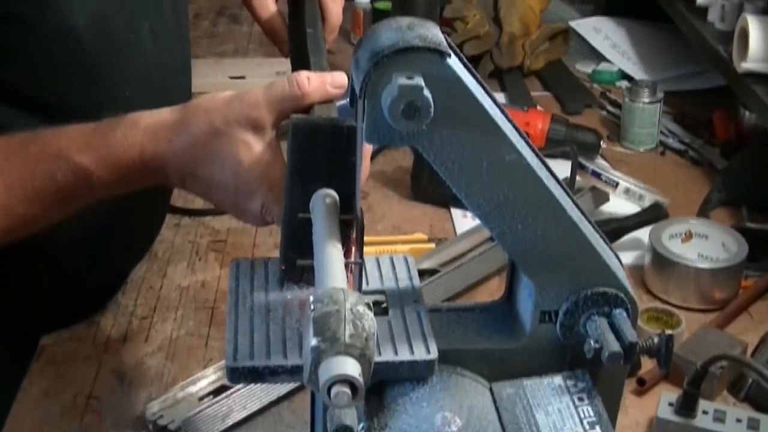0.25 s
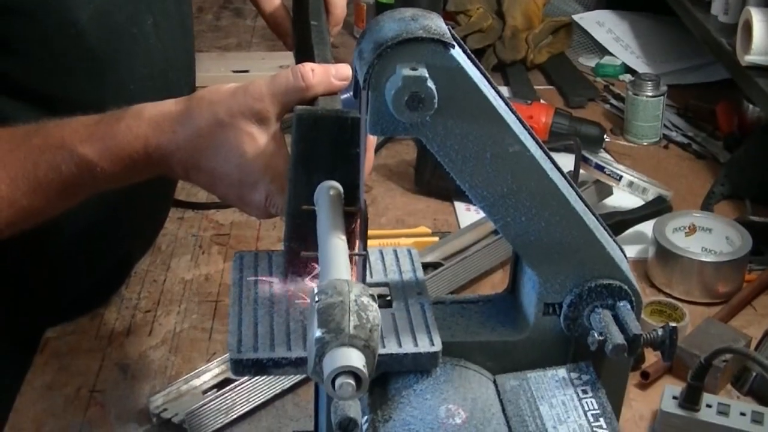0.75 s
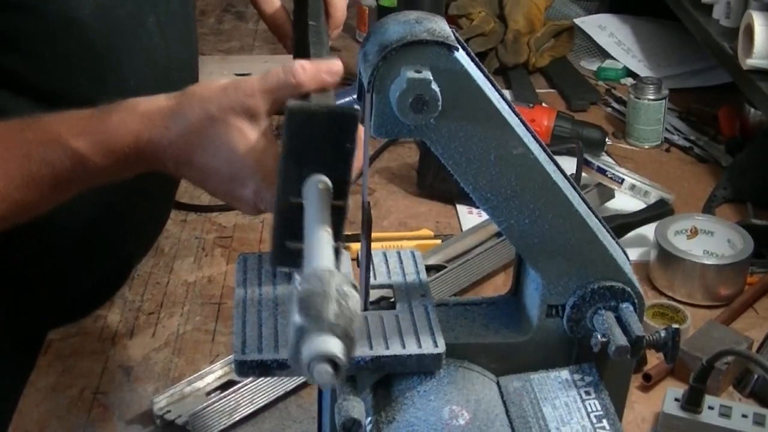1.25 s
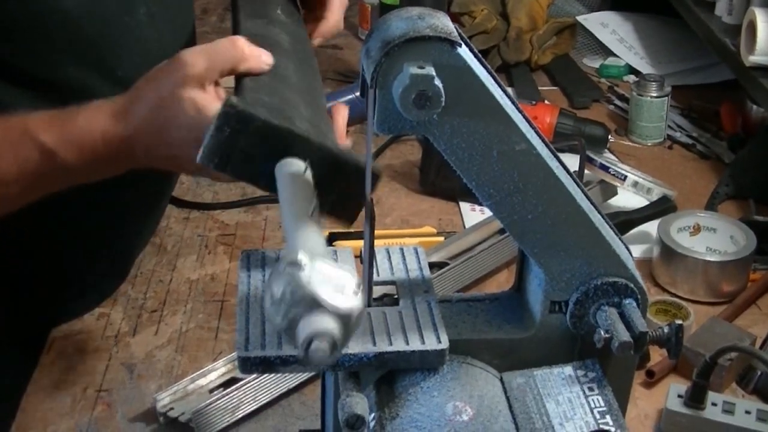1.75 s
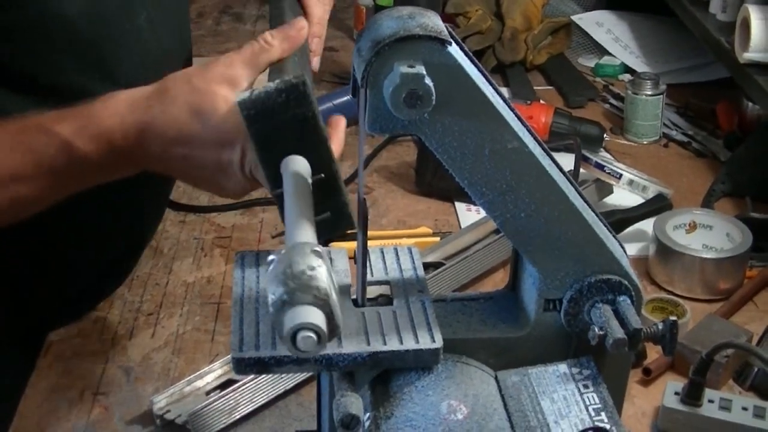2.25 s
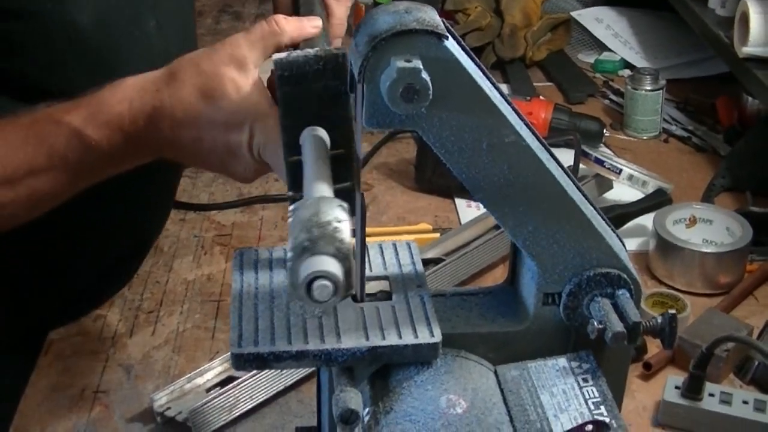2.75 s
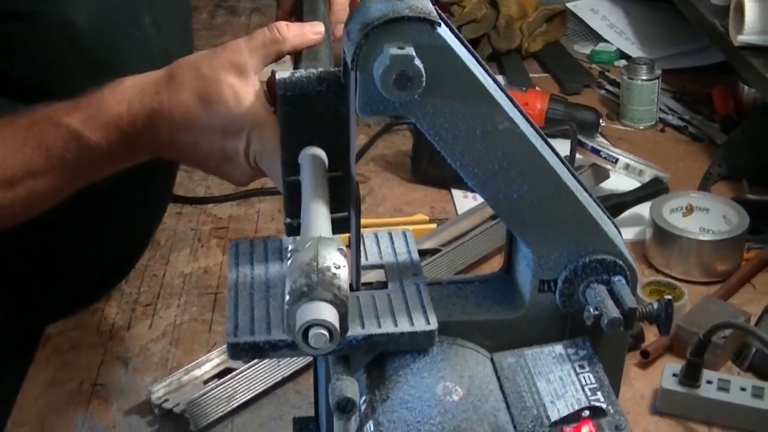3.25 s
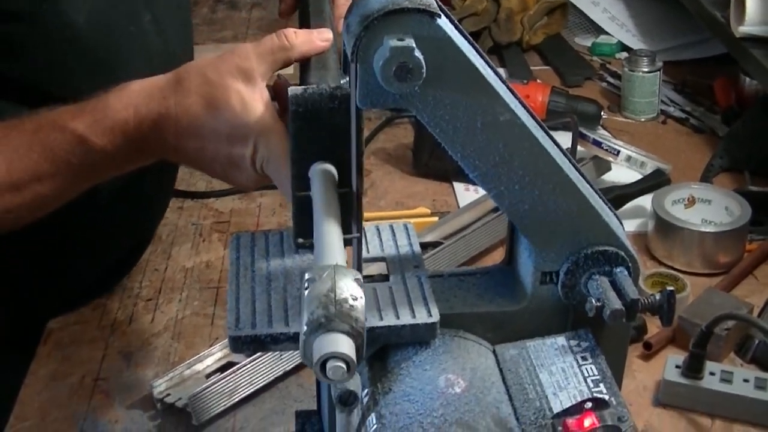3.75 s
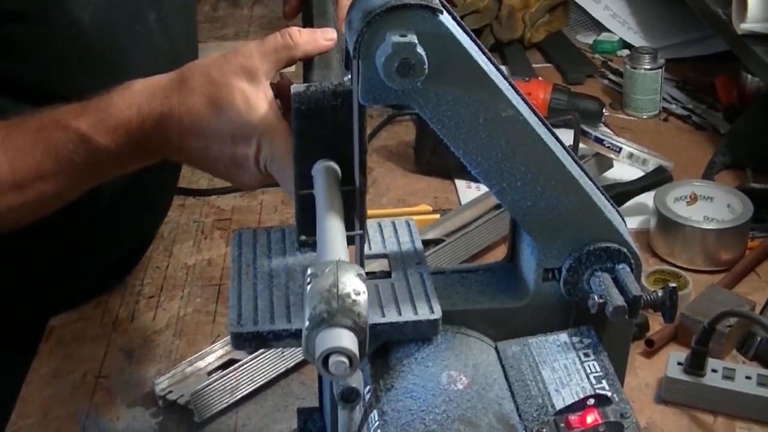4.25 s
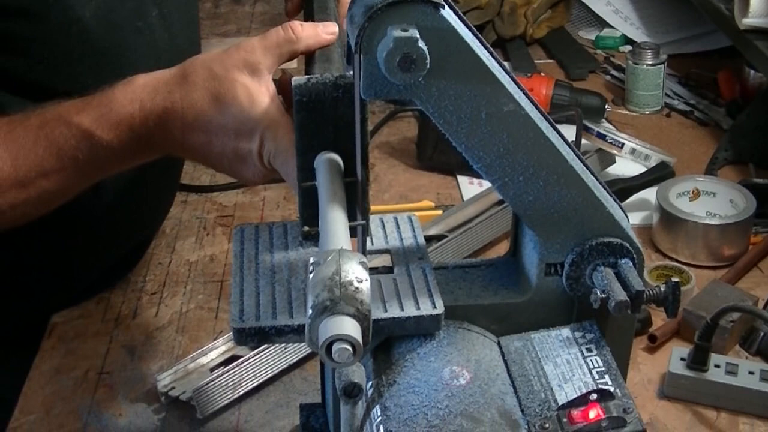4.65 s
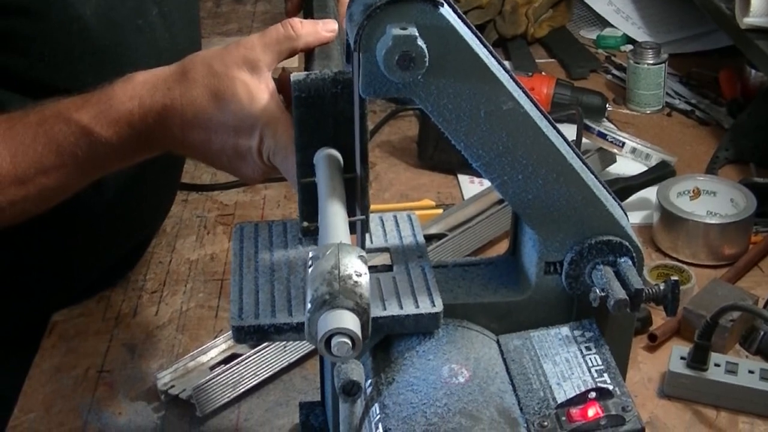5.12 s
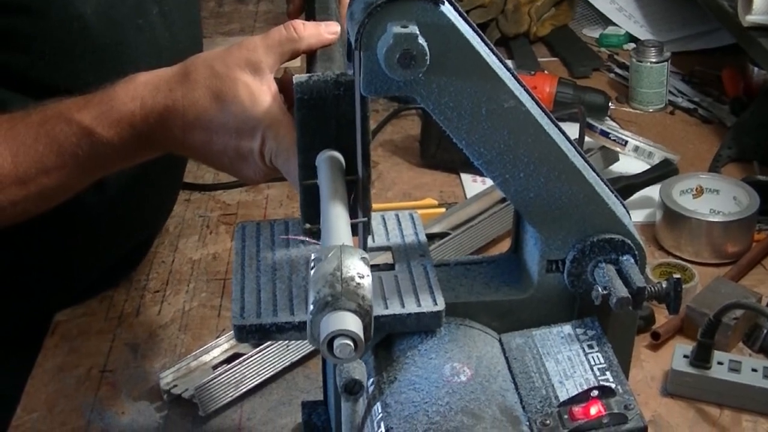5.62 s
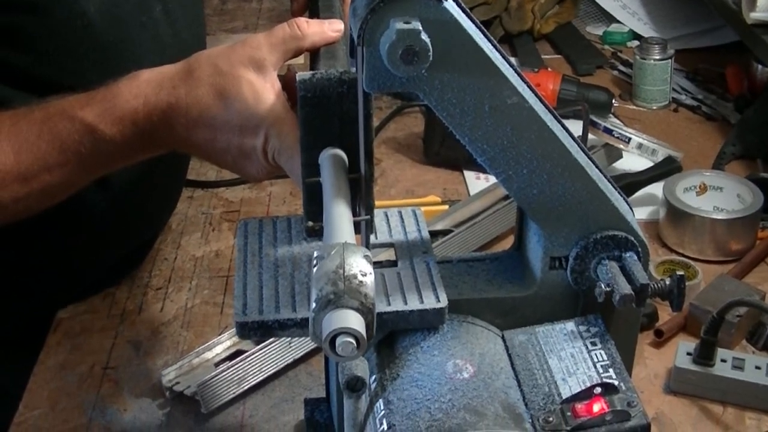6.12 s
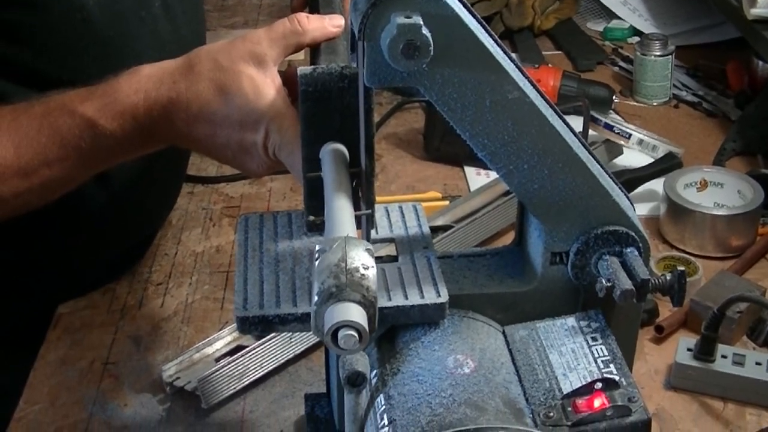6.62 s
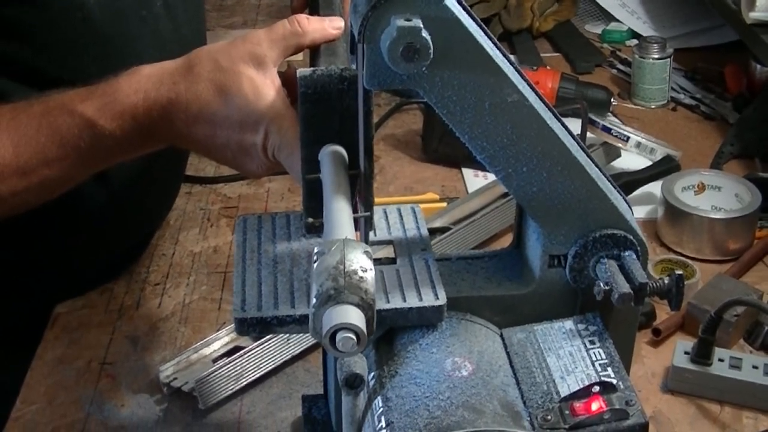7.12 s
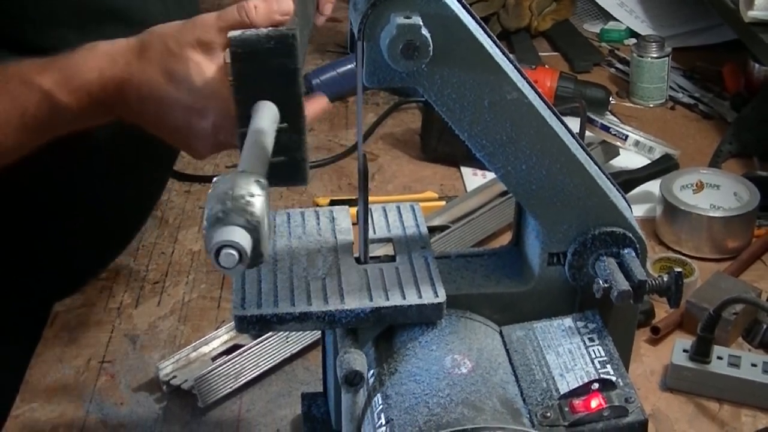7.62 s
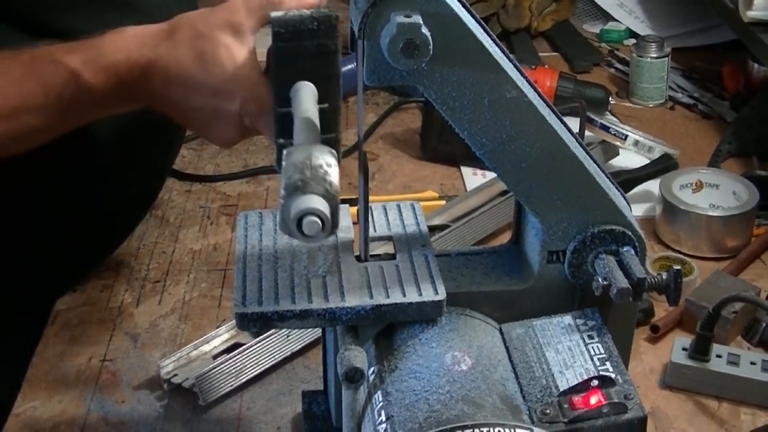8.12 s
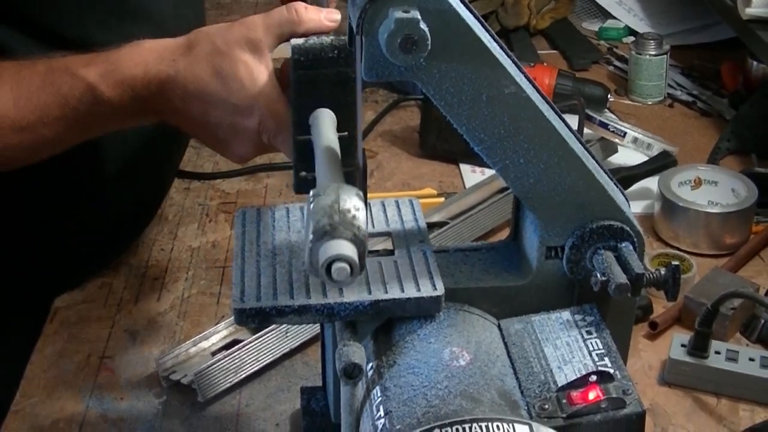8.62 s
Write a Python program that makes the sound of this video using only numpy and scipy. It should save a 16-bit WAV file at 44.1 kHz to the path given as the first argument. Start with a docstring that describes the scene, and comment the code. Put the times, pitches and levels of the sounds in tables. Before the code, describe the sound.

Metal hisses and rings against the belt of a bench sander, heard close up in a workshop. The grinding stops after about a second, leaving the machine's steady hum and buzzing rattle and one brief, high squeak. Then the metal is pressed on again for several seconds, its loud hiss covering the machine. The sander idles briefly before more grinding comes at the very end.

```python
"""A bench belt sander runs: three wheels knock once a turn at nearly the same speed and beat, over
motor hum and the rattle of belt and frame. A clamped metal piece is pressed on the belt in two long
passes and three short touches; grit tears at it, so it hisses and rings, and the load slows the wheels.
One thin squeak sounds between the passes. Gain control pulls the machine down under the hiss."""
import sys
import numpy as np
from scipy import signal
from scipy.io import wavfile
from scipy.ndimage import uniform_filter1d

SR = 44100
rng = np.random.default_rng(int(sys.argv[2]) if len(sys.argv) > 2 else 0)


def digitize_waveform(pressure):
    """Quantize a signal to 16-bit integers and store it at the path in sys.argv[1].

    Rows of a 2-D input are taken as channels; values are limited to [-1, 1].
    """
    field = np.atleast_2d(pressure).T
    bounded = np.clip(field, -1, 1)
    quanta = np.round(bounded * 32767).astype(np.int16)
    wavfile.write(sys.argv[1], SR, quanta)


N = 391166

# Harmonics of the turn rate in the knock. Each entry: harmonic number.
HARMONICS = [*range(1, 14), *range(15, 23)]
# Knock, by HARMONICS. Each row: wheel 1 level in dB, wheel 2 level in dB, wheel 2 phase lead in cycles.
KNOCK_SPECTRUM = [(-57, -56.0, 0.62), (-51.3, -40.0, 0.42), (-28.2, -61.2, 0.71), (-25.9, -30.9, 0.93),
                  (-28.4, -46.8, 0.93), (-37.0, -48.4, 0.59), (-25.9, -32.6, 0.98), (-43.7, -35.0, 0.83),
                  (-45.6, -52.3, 0.1), (-48.8, -56.1, 0.18), (-33.8, -49.8, 0.48), (-41.1, -39.4, 0.66),
                  (-34.5, -28.4, 0.62), (-38.3, -39.3, 0.61), (-41.3, -50.0, 0.75), (-62.3, -33.5, 0.63),
                  (-33.4, -33.7, 0.97), (-46.5, -50.6, 0.14), (-51.5, -44.2, 0.44), (-51.3, -46.9, 0.2),
                  (-51.8, -44.0, 0.59)]
# Wheel 3 knock, keyed by harmonic. Each row: level in dB, initial lead on wheel 1 in cycles.
THIRD_KNOCK = {1: (-56, .31), 4: (-41, .94), 8: (-39, .88), 9: (-45, .91), 10: (-46.5, .18),
               13: (-42.5, .13), 18: (-40, .37), 19: (-45, .43), 22: (-52, .09)}
# Harmonics that swell slowly. Each entry: harmonic number.
SWELLING_HARMONICS = [4, 7, 11]
# Machine drift. Each row: time in seconds, overall gain in dB, gains of harmonics 4, 7 and 11 in dB.
LEVEL_DRIFT = [(0.0, -0.5, -1.5, -0.5, -4), (0.7, 0.3, -1, -3, -3), (1.2, 0, -1.8, -0.5, 2),
               (1.6, -1.5, 0, 2.7, -5), (2.4, -1.5, 0.6, 5.5, 6), (3.1, 0.1, 2, 8.5, -2),
               (3.55, 2, -3, -10.5, -3), (4.2, 2, 1, 3, 4), (4.6, 0, 1, 4, -6), (5.0, 0.8, 1.3, 0.5, -3),
               (5.4, -1.5, 5, -3.5, 5), (5.9, -2.3, 2.5, 5, 7), (6.8, -3.5, 1, 10, 0.1),
               (7.2, -3, -2.5, 5.5, 1), (7.7, -1.2, -5, -0.5, 4), (8.2, 0, 1, -6.5, 0.1),
               (8.87, 0.7, 0.6, 2.5, 0.1)]
# Motor hum. Each row: frequency in Hz, level in dB.
HUM_TONES = [(59.5, -55), (89.4, -64), (120, -62.5), (182.7, -64), (240, -58)]
# Belt and bearing noise. Each row: frequency in Hz, relative density in dB.
RATTLE_SPECTRUM = [(30, -44), (150, -34.5), (250, -19), (400, -12.5), (650, -10), (900, -8.5), (1400, -9.5),
                   (2200, -8), (3200, -11), (5000, -14.5), (8500, -13.5), (11000, -15), (12000, -21.5),
                   (15800, -34)]
# Frame resonances and notches. Each row: centre in Hz, width in Hz, gain in dB.
FRAME_MODES = [(790, 120, 8), (1750, 150, 3), (2250, 100, -5), (2420, 60, 4), (2580, 130, 8),
               (3900, 150, -7), (4180, 100, 12), (6520, 250, 7), (7280, 90, 9), (7560, 90, 6),
               (10200, 250, 5), (10500, 100, 6), (11200, 60, 5), (11700, 120, 6)]
# Piece on the belt. Each row: touch in seconds, lift in seconds, level in dB, level slope in dB/s,
# treble tilt in dB/octave, speed sag at full force in Hz.
PRESS_EVENTS = [(-2.0, 1.09, -11.3, 0, -0.7, 1.02), (3.57, 3.9, -9.5, -30, 2.5, 0.75),
                (3.855, 7.19, -7.8, -1.6, 1.5, 0.7), (8.555, 8.86, -9, -40, 0.2, 0.6),
                (8.81, 9.5, -13, 0, 2, 0.5)]
# Grinding hiss. Each row: frequency in Hz, relative density in dB.
GRIND_SPECTRUM = [(800, -29), (2000, -7), (3500, -11), (4500, -7), (6000, -2), (8000, -5), (10500, -5.5),
                  (12000, -8.5), (14000, -16.5), (15800, -21.5)]
# Ring of the piece. Each row: centre in Hz, width in Hz, gain in dB for each of four grips.
PIECE_MODES = [(2590, 70, 3, 11, 8, 3), (4465, 60, 16, -4, -4, 2), (4910, 80, 0, 6, 6, 0),
               (5020, 70, 11, 0, 0, 0), (5280, 110, 0, 4, 3, 0), (5650, 350, -1, 7, 4, 1),
               (6370, 150, 4, 3, 2, 3), (6870, 300, 3, 1, -1, 6), (7260, 150, 6, 1, 1, 2),
               (7950, 200, 1, 6, 2, 3), (8880, 80, 3, 1, 1, 3), (9510, 60, 1, 1, 5, 1),
               (9960, 170, 4, 2, 2, 1), (10400, 350, 1, 6, 9, 1), (10900, 300, 3, 4, 2, 1),
               (12000, 400, -5, -3, -4, -2), (12500, 150, 2, 4, 4, 3)]
# Grip changes. Each entry: time in seconds.
GRIP_CHANGES_S = [2, 4.9, 8]
# Squeak. One row: centre in seconds, pitch in Hz, 1/e half-width in seconds, peak level in dB.
SQUEAK_EVENT = (2.76, 11213, .04, -24)
# Stereo width of the noise. Each row: frequency in Hz, left-right correlation from 0 to 1.
CORRELATION = [(60, 0.48), (300, 0.91), (1000, 0.99), (1700, 0.98), (2400, 1), (3800, 0.8), (4500, 0.97),
               (7000, 0.7), (11000, 0.71), (12700, .3), (15000, 0.29)]
# Stereo balance of the noise. Each row: frequency in Hz, left minus right in dB.
BALANCE = [(60, -12), (180, -6.5), (550, 0.5), (1650, -0.5), (4970, -0.5), (15000, -4.5)]

IDLE_HZ, BELT_TURN_S = 108.385, .04505  # unloaded wheel 1 rate; belt period
SECOND_SLIP_HZ, THIRD_SLIP_HZ, SECOND_LEAD_TURNS = .1103, .024, .016  # relative to wheel 1
DAMPED_HARMONIC, UNLOADED_BOOST_DB, DAMPING_DB_PER_HZ = 5, 3.5, 9  # a loaded belt damps this harmonic
ATTACK_S, EASE_S, EASED_FORCE, RELEASE_S = .055, .17, .55, .04
SAG_S, SPEED_LAG_S = .4, .07  # speed sags slowly, recovers quickly
FLASH_DB_PER_OCT, FLASH_S = 6.5, .05  # each touch starts brighter
RATTLE_DB, CUTOFF_HZ = -16, 15720


def amp(db):
    """Decibels to gain."""
    return 10 ** (np.asarray(db) / 20)


def unit_rms(x):
    """Scales to rms 1."""
    return x / np.sqrt(np.mean(x ** 2) + 1e-20)


def at_hz(table, hz):
    """Interpolates a table over log frequency."""
    table_hz, values = np.transpose(table)
    return np.interp(np.log(hz + 1), np.log(table_hz + 1), values)


def drift_db(column, t):
    """One gain column of LEVEL_DRIFT over time."""
    rows = np.array(LEVEL_DRIFT)
    return np.interp(t, rows[:, 0], rows[:, column])


def resonance_db(modes, column, hz):
    """Sum of resonance peaks and dips."""
    return sum(mode[column] / (1 + (2 * (hz - mode[0]) / mode[1]) ** 2) for mode in modes)


def belt_noise(memory, shape):
    """Noise that partly repeats every belt turn."""
    period = round(BELT_TURN_S * SR)
    fresh = rng.standard_normal((N // period + 1, *shape, period))
    repeating = signal.lfilter([1], [1, -memory], fresh, axis=0)
    return unit_rms(np.moveaxis(repeating, 0, -2).reshape(*shape, -1)[..., :N])


def shape_stereo(pair, colour_db, patch_db, ripple_db, flicker_db):
    """Colours two noises into unit-rms stereo with patches, fine ripple and treble flicker."""
    hz, t, (common, other) = signal.stft(pair, SR, nperseg=1024, noverlap=768)
    fast, slow = rng.standard_normal((len(t), len(hz), 2)).T
    patches = unit_rms(uniform_filter1d(uniform_filter1d(fast, size=10, axis=0), size=14, axis=1))
    # Bench echoes comb the noise; the comb shifts as the hands move.
    ripple = unit_rms(uniform_filter1d(uniform_filter1d(slow, size=2, axis=0), size=250, axis=1))
    hz = hz[:, None]
    flicker = unit_rms(uniform_filter1d(rng.standard_normal(len(t)), size=16)) * np.clip(hz / 5000, 0, 1)
    correlation = np.clip(at_hz(CORRELATION, hz), 0, 1)
    pan = amp(at_hz(BALANCE, hz) / 2)
    right = correlation * common + np.sqrt(1 - correlation ** 2) * other
    spectra = np.array([common * pan, right / pan])
    spectra *= amp(colour_db(hz, t) + patch_db * patches + ripple_db * ripple + flicker_db * flicker)
    return unit_rms(signal.istft(spectra, SR, nperseg=1024, noverlap=768)[1][:, :N])


def wheel_knock(t, turns, load_hz):
    """Three wheels knock once a turn; harmonic k beats at k times their slip."""
    second_lead_turns = SECOND_LEAD_TURNS + SECOND_SLIP_HZ * t
    first_and_third, second = np.zeros((2, N))
    for k, (first_db, second_db, lead) in zip(HARMONICS, KNOCK_SPECTRUM):
        phase = 2 * np.pi * (k * turns + .07 * k ** 2)  # k squared smears the knock in time
        gain = amp(drift_db(SWELLING_HARMONICS.index(k) + 2, t)) if k in SWELLING_HARMONICS else 1
        if k == DAMPED_HARMONIC:
            gain = amp(UNLOADED_BOOST_DB - DAMPING_DB_PER_HZ * load_hz)
        first_and_third += amp(first_db) * gain * np.cos(phase)
        second += amp(second_db) * gain * np.cos(phase + 2 * np.pi * (k * second_lead_turns + lead))
        if k in THIRD_KNOCK:
            third_db, third_lead = THIRD_KNOCK[k]
            third_phase = phase + 2 * np.pi * (k * THIRD_SLIP_HZ * t + third_lead)
            first_and_third += amp(third_db) * gain * np.cos(third_phase)
    return np.sqrt(2) * (first_and_third * amp([[-1.1], [.9]]) + second * amp([[-.3], [.3]]))


def motor_hum(t):
    """Steady shaft and mains tones."""
    return sum(np.sqrt(2) * amp(db) * np.sin(2 * np.pi * (hz * t + rng.random())) for hz, db in HUM_TONES)


def frame_rattle(turns):
    """Belt and bearing noise through the frame, shaken by every wheel turn."""
    def colour_db(hz, _):
        return at_hz(RATTLE_SPECTRUM, hz) + resonance_db(FRAME_MODES, 2, hz)

    shake = 1 + .1 * np.cos(2 * np.pi * turns) + .06 * np.cos(6 * np.pi * turns)
    crackle = amp(2.5 * rng.standard_normal(N))
    noise = belt_noise(memory=.17, shape=(2,)) * shake * crackle
    return amp(RATTLE_DB) * shape_stereo(noise, colour_db, patch_db=.83, ripple_db=2.85, flicker_db=.84)


def hand_presses(t):
    """Each press bites, holds, eases and lifts; the speed sag trails the load."""
    gain, tilt_db_per_oct, load_hz, sag_hz = np.zeros((4, N))
    for touch_s, lift_s, level_db, slope_db_per_s, held_tilt, full_sag_hz in PRESS_EVENTS:
        elapsed_s, remaining_s = np.maximum(t - touch_s, 0), lift_s - t
        attack = np.minimum(elapsed_s / ATTACK_S, 1) ** 2
        ease = 1 - (1 - EASED_FORCE) * np.clip(1 - remaining_s / EASE_S, 0, 1)
        force = attack * ease * np.exp(np.minimum(remaining_s, 0) / RELEASE_S)
        gain += force * amp(level_db + slope_db_per_s * elapsed_s)
        flash = FLASH_DB_PER_OCT * np.exp(-elapsed_s / FLASH_S)
        tilt_db_per_oct = np.where(t >= touch_s, held_tilt + flash, tilt_db_per_oct)
        load_hz += full_sag_hz * force
        sag_hz += full_sag_hz * force * (1 - np.exp(-elapsed_s / SAG_S))
    pole = np.exp(-1 / (SPEED_LAG_S * SR))
    sag_hz = signal.lfilter([1 - pole], [1, -pole], sag_hz, zi=[sag_hz[0]])[0]
    return gain, tilt_db_per_oct, load_hz, sag_hz


def grinding(t, turns, tilt_db_per_oct):
    """Grit tears at the ringing metal; worn and sharp stretches return every belt turn."""
    def colour_db(hz, frame_s):
        grips_db = np.hstack([resonance_db(PIECE_MODES, column, hz) for column in range(2, 6)])
        ring_db = grips_db[:, np.searchsorted(GRIP_CHANGES_S, frame_s)]
        tilt_db = np.interp(frame_s, t, tilt_db_per_oct) * np.log2(np.maximum(hz, 3000) / 7500)
        return at_hz(GRIND_SPECTRUM, hz) + ring_db + tilt_db

    bite_db = 1.7 * unit_rms(uniform_filter1d(belt_noise(memory=.95, shape=()), size=40))
    shake = 1 + .11 * np.cos(4 * np.pi * turns)
    grit = belt_noise(memory=.48, shape=(2,)) * amp(bite_db) * shake
    return shape_stereo(grit, colour_db, patch_db=.78, ripple_db=2.1, flicker_db=.35)


def squeak(t):
    """One brief, thin whistle."""
    centre_s, hz, half_width_s, db = SQUEAK_EVENT
    return amp(db) * np.exp(-((t - centre_s) / half_width_s) ** 2) * np.sin(2 * np.pi * hz * t)


def scene():
    """Wavering machine plus grinding, close up, in stereo."""
    t = np.arange(N) / SR
    grind_gain, tilt_db_per_oct, load_hz, sag_hz = hand_presses(t)
    turns = np.cumsum(IDLE_HZ - sag_hz) / SR
    tones = (motor_hum(t) + squeak(t)) * amp([[-.7], [.7]])
    machine = wheel_knock(t, turns, load_hz) + tones + frame_rattle(turns)
    waver = unit_rms(uniform_filter1d(uniform_filter1d(rng.standard_normal(N), size=3000), size=3000))
    machine *= amp(drift_db(1, t) + .56 * waver)
    return machine + grind_gain * grinding(t, turns, tilt_db_per_oct)


def record(dry):
    """Lagging, treble-driven gain control, soft ceiling, low-pass."""
    lag_s, threshold_db, reduction_db_per_db, ceiling = .034, -20.79, .68, .95
    treble_power = (signal.lfilter([1, -.85], [1], dry) ** 2).mean(0)
    pole = np.exp(-1 / (lag_s * SR))
    lagged_power = signal.lfilter([1 - pole], [1, -pole], treble_power, zi=[treble_power[:4000].mean()])[0]
    over_db = np.maximum(10 * np.log10(lagged_power + 1e-12) - threshold_db, 0)
    ducked = dry / amp(reduction_db_per_db * over_db)
    rounded = ducked / (1 + (ducked / ceiling) ** 4) ** .25
    lowpass = signal.firwin(1023, CUTOFF_HZ, window=("kaiser", 9), fs=SR)
    return signal.oaconvolve(rounded, lowpass[None], "same")


dry = scene()
out = record(dry)
digitize_waveform(out)
```